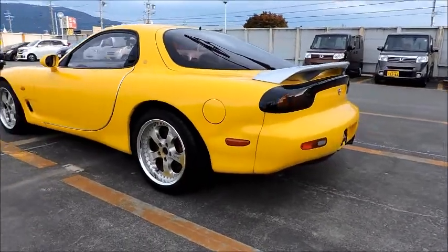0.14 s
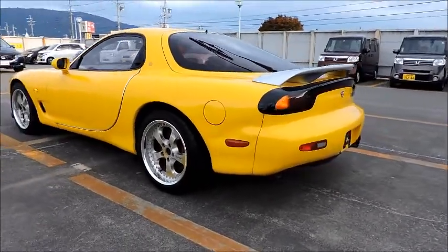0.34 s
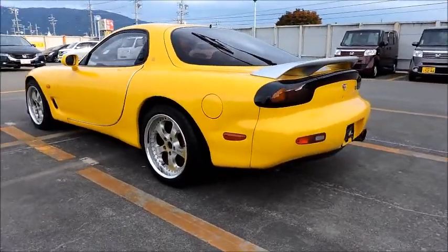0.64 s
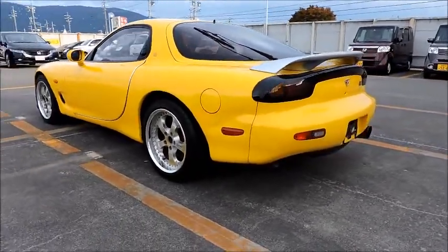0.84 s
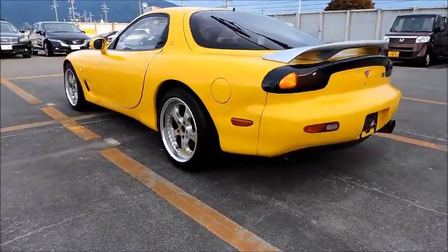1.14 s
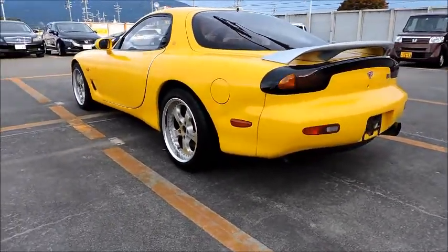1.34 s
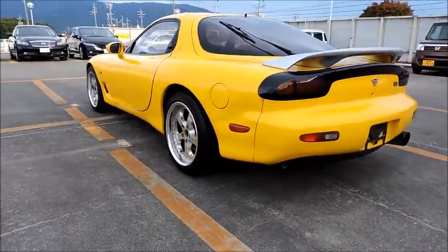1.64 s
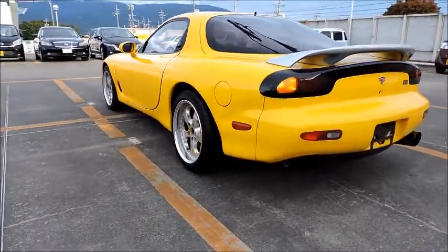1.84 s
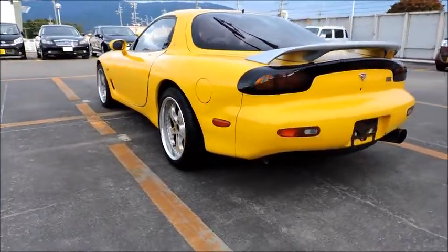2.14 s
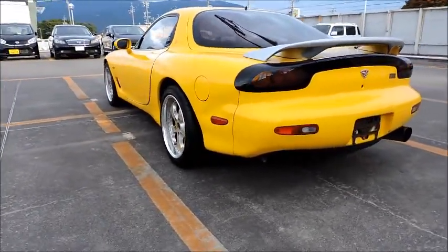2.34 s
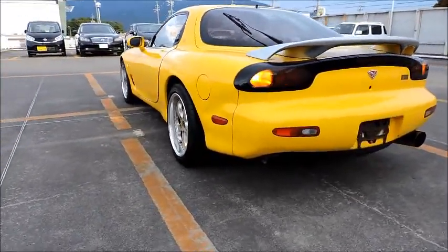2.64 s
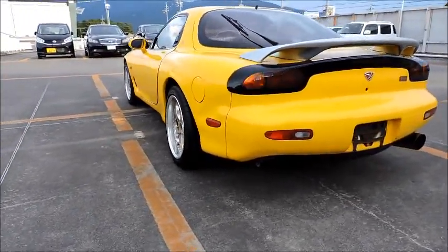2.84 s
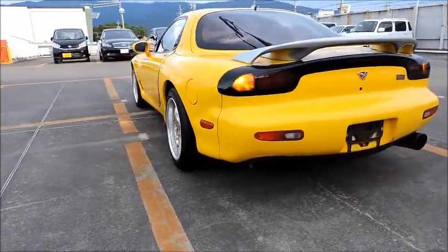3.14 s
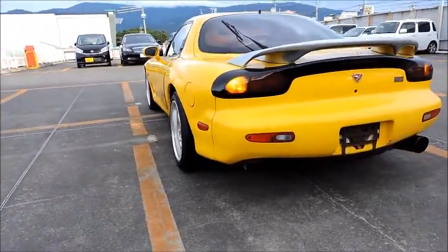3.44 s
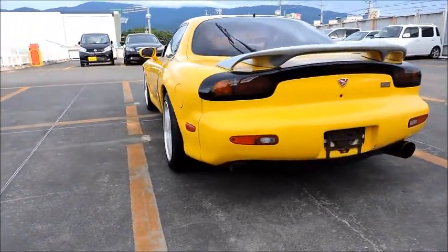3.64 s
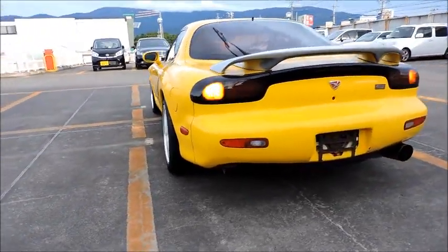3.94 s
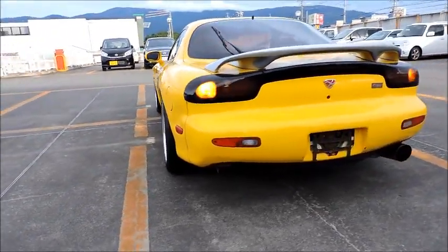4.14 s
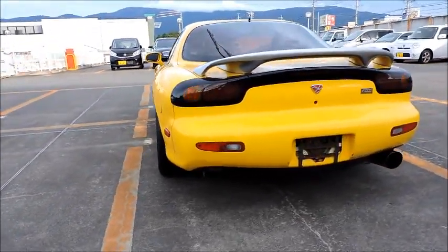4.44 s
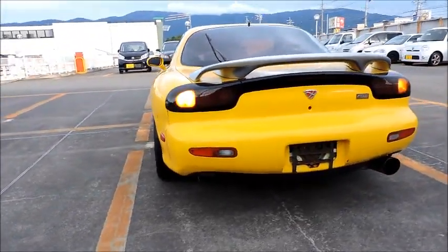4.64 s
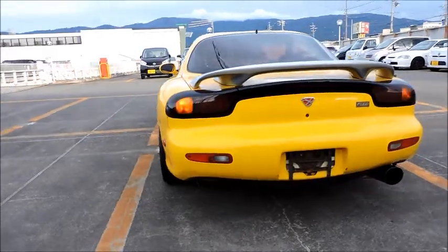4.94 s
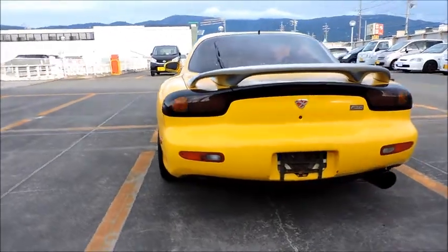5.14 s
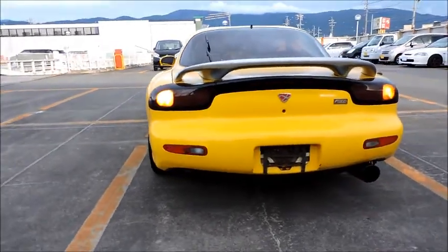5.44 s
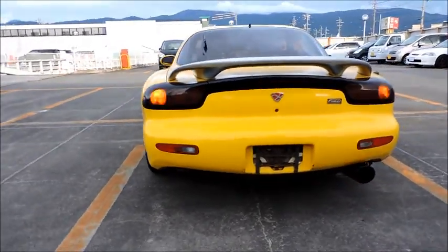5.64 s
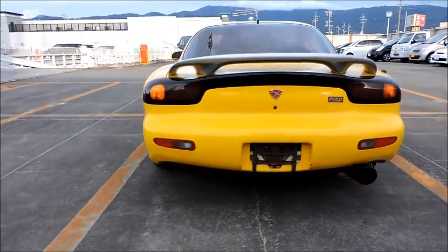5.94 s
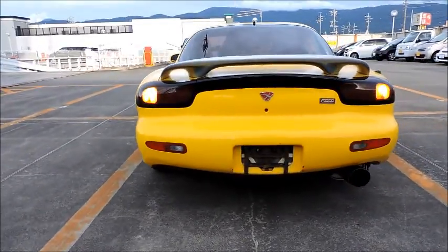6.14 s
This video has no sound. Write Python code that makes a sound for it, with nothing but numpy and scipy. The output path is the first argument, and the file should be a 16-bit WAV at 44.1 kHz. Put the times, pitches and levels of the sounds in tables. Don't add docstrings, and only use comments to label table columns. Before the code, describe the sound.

From 0 seconds a two-rotor engine idles steadily in an open lot: about twenty lumpy pulses a second, alternating unequally, with a deep boom near 65 hertz, a weaker tone above, a hollow metallic ring and hissing, spitting gas. A handheld stereo microphone walks round to the tailpipe; the exhaust is further off until 2, grows near 3, and is loudest by 6.3. Wind buffets strike left and right separately: thuds and rips at 0.4-0.9, smaller hits at 1.3-1.8, clusters at 2.3-2.8, the heaviest at 3.9-4.6, more at 4.9-5.3 and 5.8-6.3. Automatic gain drops quickly under hard gusts, then climbs back. Tiny microphone ticks accompany some. A thin insect scrape around 13 kilohertz appears faintly at 0.1-0.5, 1.8-2.3, 3.4-3.9 and 5.2-5.6, mostly right. A faint brake squeak whistles at 3.24-3.5 over soft wide hiss.

```python
import sys
import numpy as np
from scipy import signal
from scipy.fft import rfft, irfft, next_fast_len
from scipy.io import wavfile
from scipy.ndimage import uniform_filter1d, map_coordinates

SR = 44100
rng = np.random.default_rng(int(sys.argv[2]) if len(sys.argv) > 2 else 0)


def magnitude_from_level(level_db):
    exponent = np.asarray(level_db, float) / 20
    return 10 ** exponent


def output_pcm(signal):
    pcm = np.clip(np.atleast_2d(signal).T, -1, 1) * 32767
    wavfile.write(sys.argv[1], SR, np.round(pcm).astype(np.int16))


N = 277808
TIME = np.arange(N) / SR
BEAT_HZ = 20

# start_s, left_port_delay_samples
BEARING = [
    (0, -3),
    (.7, -4),
    (2, -2),
    (3.5, 0),
    (4.2, 2),
    (6.3, 2),
]


def unit(x):
    return x / np.sqrt(np.mean(x ** 2) + 1e-20)


def along(points, hz):
    f, v = np.transpose(points)
    return np.interp(np.log(hz + 1), np.log(f + 1), v)


def curves(rows):
    s, *cols = np.transpose(rows)
    return [np.interp(TIME, s, c) for c in cols]


def wobble(rate):
    knots = rng.standard_normal(int(N * rate / SR) + 4)
    return map_coordinates(knots, [TIME * rate])


def filtered(x, response):
    length = x.shape[-1]
    m = next_fast_len(length + SR // 2)
    return irfft(rfft(x, m) * response(np.fft.rfftfreq(m, 1 / SR)), m)[..., :length]


def mode(f, centre_hz, width_hz):
    return 1j * f * width_hz / (centre_hz ** 2 - f * f + 1j * f * width_hz)


def resonate(x, modes):
    return filtered(x, lambda f: sum(magnitude_from_level(db) * mode(f, c, w) for c, w, db in modes))


def noise(spectrum):
    return unit(filtered(rng.standard_normal(N), lambda hz: magnitude_from_level(along(spectrum, hz))))


def pair(spectrum, alike):
    def blend(hz):
        turn = np.arccos(np.clip(along(alike, hz), -1, 1)) / 2
        return magnitude_from_level(along(spectrum, hz)) * [np.cos(turn), np.sin(turn)]

    mid, side = filtered(rng.standard_normal((2, N)), blend)
    return unit(np.array([mid + side, mid - side]))


def swell_in_out(start_s, end_s):
    return np.sin(np.pi * np.clip((TIME - start_s) / (end_s - start_s), 0, 1))


def jet(since, rise_s):
    return since / rise_s * np.exp(1 - since / rise_s)


def exhaust_boom(turns, chance):
    # centre_hz, width_hz, level_db, sense_at_open_end (+1 or -1)
    pipe = [
        (30, 45, -14.6, 1),
        (65.4, 13.2, 0, -1),
        (108.4, 12.3, -12.6, -1),
        (159, 41, -24, 1),
    ]
    fires = np.flatnonzero(np.diff(np.floor(turns)) > 0)
    run_in = SR // 2
    earlier = fires[0] - np.arange(1, 9) * SR // BEAT_HZ
    fires = np.append(earlier, fires) + run_in
    rotor_sign = (-1.) ** np.arange(len(fires))
    train = np.zeros(N + run_in)
    train[fires] = magnitude_from_level(.6 * chance[:len(fires), 0] - .7 * rotor_sign)

    def response(f):
        ringing = sum(sense * magnitude_from_level(db) * mode(f, c, w) for c, w, db, sense in pipe)
        return ringing * np.exp(-(f / 300) ** 2)

    return unit(filtered(train, response)[run_in:])


def exhaust_gas(turns, chance, round_by):
    # pitch_hz, level_db (per Hz)
    gas_colour = [(30, -11.5), (150, -5), (250, -7.5), (320, -11.5), (500, -16.5), (800, -19.5),
                  (1100, -24), (1600, -26), (2200, -33.5), (3200, -42.5), (5000, -54), (9000, -67.5)]
    # pitch_hz, likeness (0-1)
    gas_likeness = [(60, 0.8), (500, 0.7), (900, 0.9), (1500, 0.4), (2600, 0.2), (8000, 0)]
    # pitch_hz, level_db (per Hz)
    spit_colour = [(1500, -30), (3000, -8), (5000, -10), (9000, -6), (13000, 0), (16000, -3)]
    # centre_hz, width_hz, level_db
    silencer = [(247.2, 37, 1), (396, 91, -1), (486.5, 38, -5.5)]
    # centre_hz, width_hz, level_db
    tip = [(613.5, 26, 0)]
    # centre_hz, width_hz, level_db
    mouth = [(1598, 250, 0)]
    since = turns % 1 / BEAT_HZ
    rotor = magnitude_from_level(2.2 * (-1.) ** np.floor(turns) + 1.6 * chance[turns.astype(int), 1])

    def blast(rise_s, steady):
        return rng.standard_normal(N) * (rotor * jet(since, rise_s) + steady)

    can_db, tip_db = -1.1 * round_by - 46.5, 1.9 * round_by - 52
    gas = pair(gas_colour, gas_likeness) * (1 + .5 * jet(since, .0033)) * magnitude_from_level(.45 * wobble(6.5))
    can_ring = magnitude_from_level(can_db) * unit(resonate(resonate(blast(.0034, .19), silencer), silencer))
    tip_ring = magnitude_from_level(tip_db) * unit(resonate(blast(.0092, .53), tip))
    mouth_ring = magnitude_from_level(-59) * unit(resonate(resonate(blast(.003, .04), mouth), mouth))
    spit = magnitude_from_level(-62.7) * pair(spit_colour, [(1000, .6)]) * rotor * jet(since, .0036)
    return magnitude_from_level(-36) * gas + can_ring + tip_ring + mouth_ring + spit


def engine():
    # start_s, lead_ms
    early = [(0.0, -0.3), (0.46, 4.5), (0.78, 1), (1.02, 2), (1.34, -3), (2.46, -5), (3.11, -1.2),
             (3.4, -3), (4.03, -11), (4.55, -14), (4.93, -13.5), (5.24, -10), (6.3, -11)]
    # start_s, level_db
    nearness = [
        (0, -1),
        (1.8, -1.5),
        (3, 2.5),
        (3.6, 0.5),
        (4.2, 2),
        (5.4, 4.5),
        (6.3, 6.5),
    ]
    near_db, round_by = curves(nearness)[0], curves(BEARING)[0]
    turns = BEAT_HZ * (TIME + (curves(early)[0] + 6.3) / 1000)
    firings = np.count_nonzero(np.diff(np.floor(turns)) > 0) + 8
    chance = rng.standard_normal((firings, 2))
    boom = magnitude_from_level(near_db - 21) * exhaust_boom(turns, chance)
    gas = magnitude_from_level(.28 * near_db) * exhaust_gas(turns, chance, round_by)
    left, right = magnitude_from_level([[-2.4], [2.4]]) * (boom + gas)
    left = map_coordinates(left, [np.arange(N) - round_by], mode="nearest")
    return np.array([left, right])


def flutter(gusts):
    rows = []
    for start_s, end_s, gust_db in gusts:
        gap, size, long, bright = rng.standard_normal((16, 4)).T
        s = start_s + .0219 * (np.cumsum(magnitude_from_level(2.35 * gap)) - .5)
        db = gust_db + 3 * size
        length_ms = 13.2 * magnitude_from_level(1.8 * long)
        rip_db = db - 11.5 + 4 * bright
        rows += list(np.transpose([s, db, length_ms, rip_db])[s < end_s])
    return rows


def port(hard, gusts):
    # pitch_hz, level_db (per Hz)
    thud_colour = [(15, -26.5), (60, -5), (140, 0), (260, 0), (380, -12), (700, -39), (1500, -110)]
    # pitch_hz, level_db (per Hz)
    slap_colour = [(100, -39), (260, -5.5), (380, 4), (600, -4.5), (900, -15.5), (1400, -33), (3000, -110)]
    # pitch_hz, level_db (per Hz)
    rip_colour = [(300, -50), (700, 3), (1100, 4.5), (1600, -7.5), (2400, -23), (3500, -40.5), (6000, -68),
                  (9000, -120)]
    # pitch_hz, level_db (per Hz)
    rumble_colour = [(10, -5.5), (25, -2), (60, -1.5), (130, -4), (250, -16.5), (500, -55.5), (1000, -120)]
    thud, slap, rip = np.zeros((3, N))
    for s, db, ms, rip_db in hard + flutter(gusts):
        tight = .21 + .15 * max(12.34 - ms, 0)
        near = slice(max(round((s - .12) * SR), 0), round((s + .12) * SR))
        shape = magnitude_from_level(db) * np.exp(-np.abs((TIME[near] - s) / (.7 * ms / 1000)) ** 2)
        thud[near] += np.sqrt(np.clip(1 - tight, 0, 1)) * shape
        slap[near] += np.sqrt(np.clip(tight, 0, 1)) * shape
        rip[near] += magnitude_from_level(rip_db + 1 - db) * shape ** 2
    swell = uniform_filter1d(uniform_filter1d(thud + slap, size=SR // 14), size=SR // 14)
    spikes = magnitude_from_level(9.1 * np.tanh(wobble(260)))

    def full(x):
        return x / np.sqrt(np.abs(uniform_filter1d(x * x, size=SR // 70)) + .074)

    bursts = .84 * thud * full(noise(thud_colour))
    bursts += .81 * slap * full(spikes * noise(slap_colour))
    bursts += .87 * rip * full(spikes ** 1.5 * noise(rip_colour))
    between = .19 * swell * magnitude_from_level(5.1 * wobble(40)) * (noise(thud_colour) + .55 * noise(slap_colour))
    rumble = (.62 * swell + .016) * magnitude_from_level(3.54 * wobble(12)) * noise(rumble_colour)
    return bursts + between + rumble


def wind():
    # start_s, level_db, length_ms, rip_db
    left_eddies = [(0.482, -19.5, 14, -32), (0.69, -23, 15, -6), (0.702, -17, 12, -32),
                   (0.896, -16.5, 23, -37), (1.309, -17, 16, -29), (1.353, -16, 18, -45),
                   (1.375, -13.5, 16, -34.5), (1.473, -13, 11.7, -31.5), (1.686, -8, 5.2, -21),
                   (1.786, -22.5, 15, -34.5), (2.32, -13.5, 10, -19), (2.406, -8.5, 11.6, -23),
                   (2.487, -11.5, 11, -29), (2.729, -15.5, 11, -27), (3.898, -20, 16, -21),
                   (4.162, -17, 21, -20), (4.201, -12, 11.6, -24), (4.222, -15, 13, -38),
                   (4.265, -5.5, 14, -28), (4.575, -17.5, 18, -34), (5.074, -3.5, 11.5, -31.5),
                   (5.101, -12, 7.8, -18), (5.127, -10.5, 8.5, -29), (5.149, -6.5, 11.5, -25),
                   (5.201, -5.5, 15, -24), (5.779, -13.5, 12.4, -34.5), (5.864, -16, 13, -16.5),
                   (5.906, -9, 16, -13), (6.001, -6.5, 19, -17), (6.266, -13.5, 12.5, -32.5)]
    right_eddies = [(0.441, -16, 15.4, -32), (0.505, -10.5, 27.4, -17), (0.608, -4.5, 13.1, -15.5),
                    (0.708, -10, 10.3, -26), (0.795, -13.5, 16, -26), (0.812, -7.5, 8.2, -22),
                    (1.303, -10.5, 9.1, -30), (1.373, -11.5, 12.7, -32), (2.316, -8.5, 6.8, -26),
                    (2.333, -8.5, 26, -17), (2.385, -14, 15.6, -30), (2.731, -12.5, 6.9, -29),
                    (2.753, -10.5, 18, -28), (2.791, -9, 26, -40), (2.836, -7.5, 13.7, -25.5),
                    (3.906, -4.5, 13, -26.5), (3.961, -2.5, 29.2, -10.5), (4.03, -3, 22, -13.5),
                    (4.058, -7, 10.3, -9), (4.204, -13.5, 9.1, -9), (4.234, -5, 12.5, -10),
                    (4.259, -11, 9.9, -31), (4.303, -9.5, 7.2, -21), (4.341, -10, 11.5, -15),
                    (4.581, -15, 11.3, -25), (5.003, -5, 24, -15.5), (5.052, -11.5, 20, -22),
                    (5.277, -10, 20, -25.5), (5.875, -12.5, 30, -23), (6.012, -12.5, 21, -17)]
    # start_s, end_s, level_db
    left_gusts = [(0.439, .47, -28), (.65, .77, -24), (1.382, 1.42, -25.5), (1.488, 1.65, -25),
                  (2.24, 2.36, -30.5), (2.519, 2.65, -24.5), (3.858, 4.09, -25), (4.301, 4.47, -24),
                  (4.539, 4.69, -25), (5.155, 5.3, -16.5), (5.799, 5.95, -19.5), (6.23, 6.27, -22)]
    right_gusts = [(.73, .86, -18), (2.28, 2.37, -21), (2.48, 2.53, -15.5), (2.789, 2.83, -16),
                   (4.136, 4.3, -16), (4.915, 5.0, -18.5), (5.073, 5.23, -16), (5.92, 6.0, -17.5),
                   (6.257, 6.31, -17)]
    return np.array([port(left_eddies, left_gusts), port(right_eddies, right_gusts)])


def snaps():
    # start_s, peak_db
    ticks = [
        (3.9546, -45.5),
        (3.9733, -47),
        (4.2344, -62.5),
        (4.9194, -50.5),
        (5.2071, -49),
        (5.8718, -49.5),
    ]
    length = SR // 500
    x = np.zeros(N)
    for s, db in ticks:
        fade_db = -60 * TIME[:length] / .002
        x[round(s * SR):][:length] += magnitude_from_level(db + 6.5 + fade_db) * rng.standard_normal(length)
    return magnitude_from_level([[-8], [3]]) * x


def insect():
    # start_s, end_s, level_db
    song = [
        (0.076, .54, -63),
        (1.82, 1.99, -66),
        (2.0, 2.32, -69),
        (3.415, 3.892, -70.5),
        (5.178, 5.59, -68),
    ]
    phrase = sum(magnitude_from_level(db) * swell_in_out(a, b) ** .6 for a, b, db in song)
    wing = noise([(7000, -34.5), (10300, -12), (11800, -18.5), (13000, -12.5),
                  (13600, -3.5), (14250, -10.5), (15500, -36)])
    return magnitude_from_level([[-9], [2.5]]) * phrase * magnitude_from_level(1.5 * wobble(30)) * wing


def squeak():
    # start_s, end_s, pitch_hz, level_db
    start_s, end_s, pitch_hz, level_db = (3.24, 3.52, 3266, -65)
    tone = np.sin(2 * np.pi * pitch_hz * TIME + .9 * wobble(40))
    return magnitude_from_level(level_db + 2.5 * wobble(30)) * swell_in_out(start_s, end_s) * tone


def lot_hiss():
    # pitch_hz, level_db (per Hz)
    lot_colour = [(300, -26), (2000, 5), (4000, -1.5), (7000, -6.5), (10000, -7.5), (13000, -7),
                  (16000, -9.5)]
    return magnitude_from_level(-62) * pair(lot_colour, [(1000, .15)])


def gain_db():
    # start_s, gain_db
    ducks = [(.54, -6.5), (.73, -11), (1.42, -3), (1.72, -5), (2.35, -5), (2.5, -6.5), (2.74, -7.5),
             (3.75, -0.6), (4.0, -11), (4.15, -11.5), (4.31, -10.5), (5.0, -10.5), (5.15, -10.5),
             (5.78, -4), (5.94, -10), (6.1, -8)]
    open_db, hold_s = 1.17, .27
    fall_db_per_s, recover_db_per_s = 107.5, 22
    s, db = np.transpose(ducks)[..., None]
    slope = np.maximum(fall_db_per_s * (s - TIME), recover_db_per_s * (TIME - s - hold_s))
    lowest = (db + np.maximum(slope, 0)).min(axis=0)
    return uniform_filter1d(np.minimum(lowest, open_db), size=SR // 50)


def scene():
    return engine() + wind() + snaps() + insect() + squeak() + lot_hiss()


def low_pass(x):
    return signal.sosfilt(signal.butter(12, 15760, fs=SR, output="sos"), x)


def record(dry):
    hiss = magnitude_from_level(-76) * pair([(100, 0), (16000, -2)], [(1000, .02)])
    x = dry * magnitude_from_level(gain_db()) + hiss
    x = x / (1 + np.abs(x / .98) ** 6) ** (1 / 6)
    return low_pass(x)


dry = scene()
out = record(dry)
output_pcm(out)
```